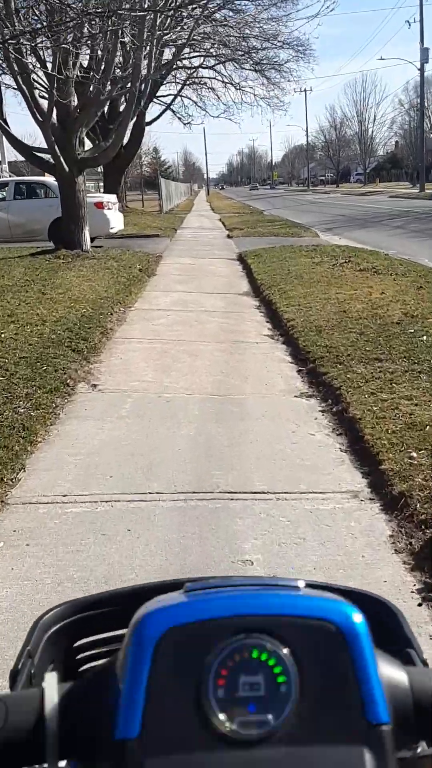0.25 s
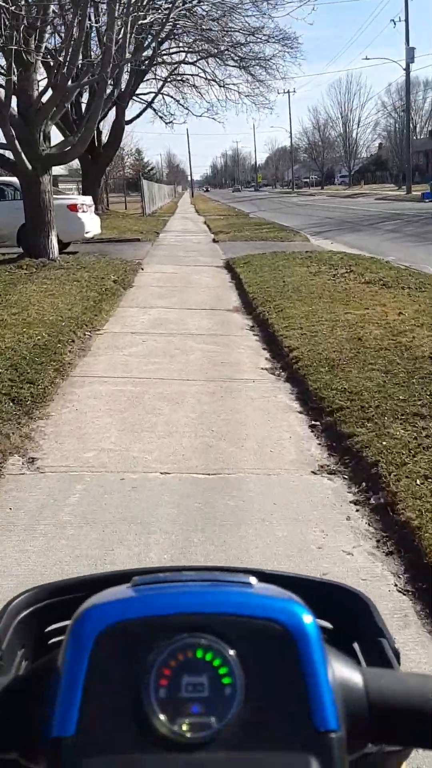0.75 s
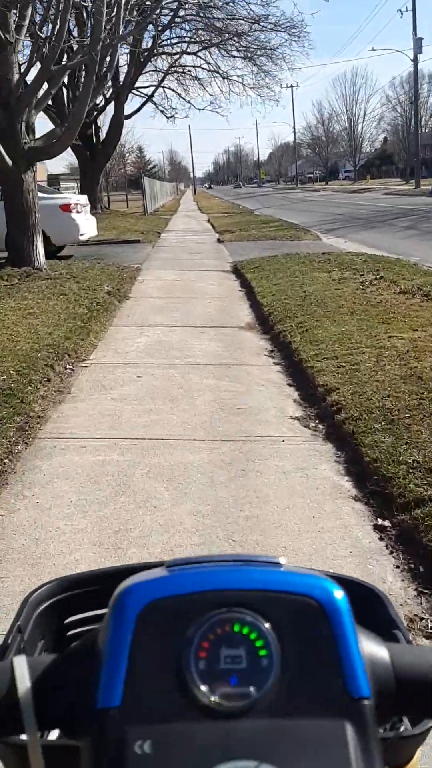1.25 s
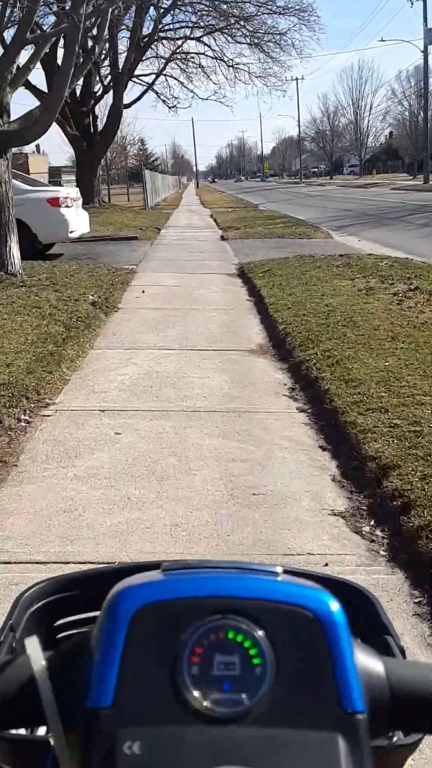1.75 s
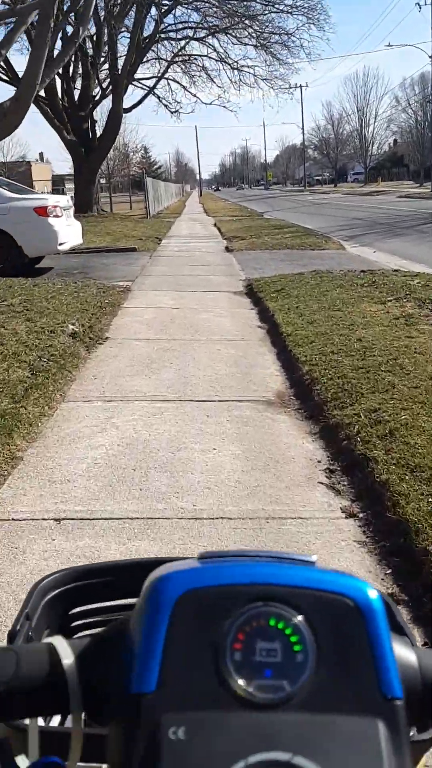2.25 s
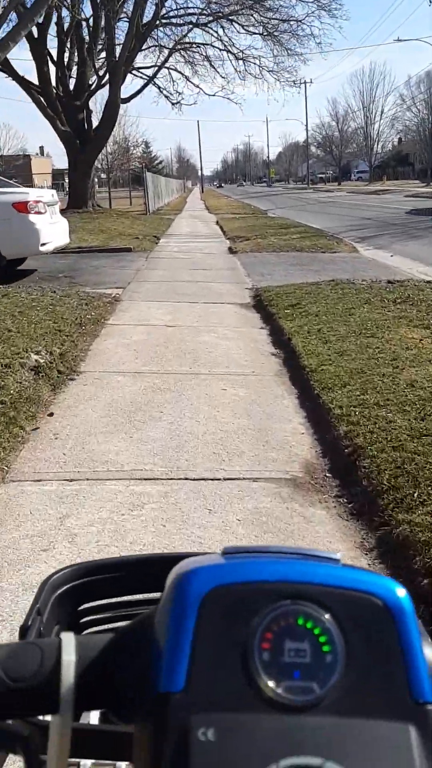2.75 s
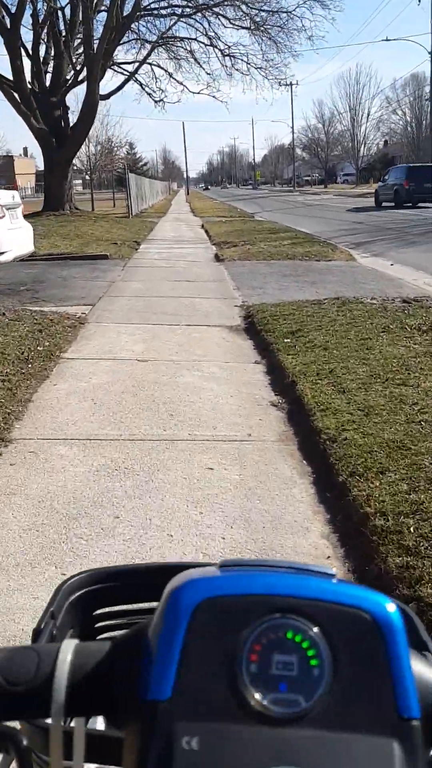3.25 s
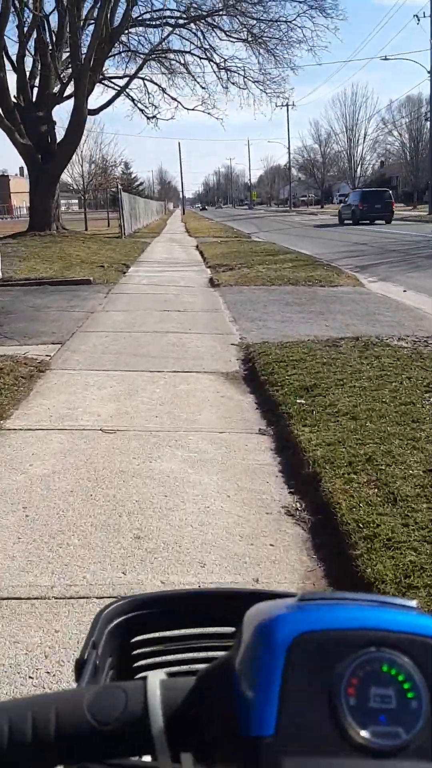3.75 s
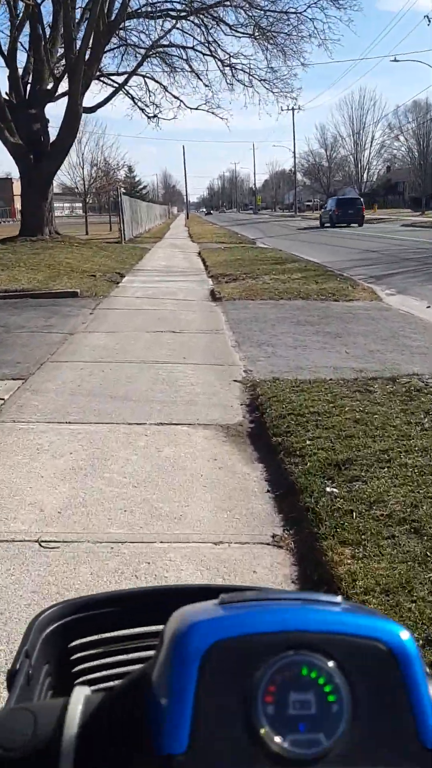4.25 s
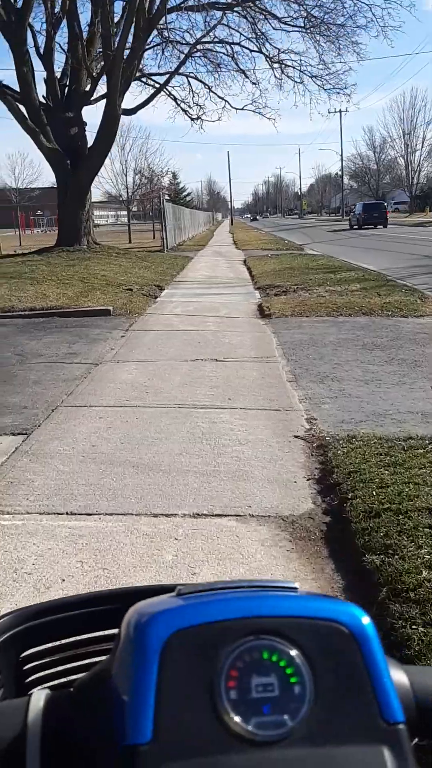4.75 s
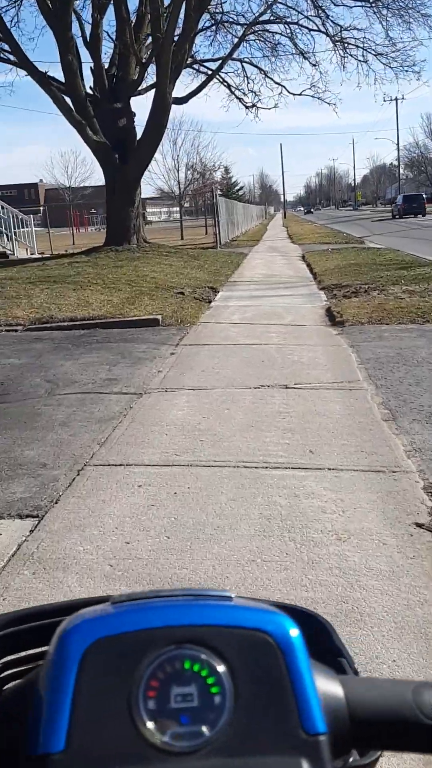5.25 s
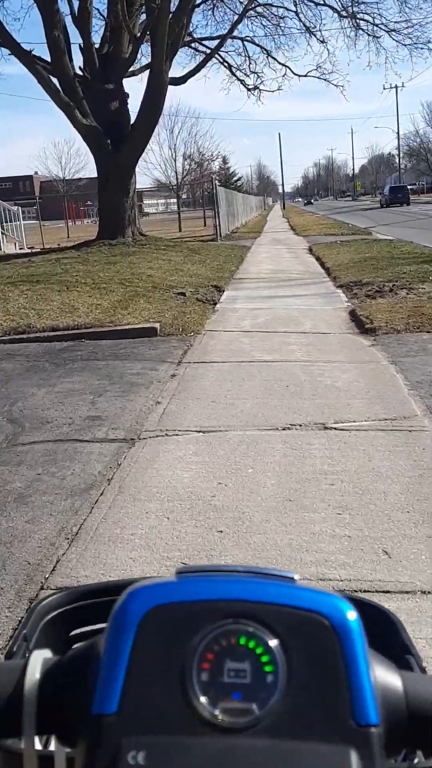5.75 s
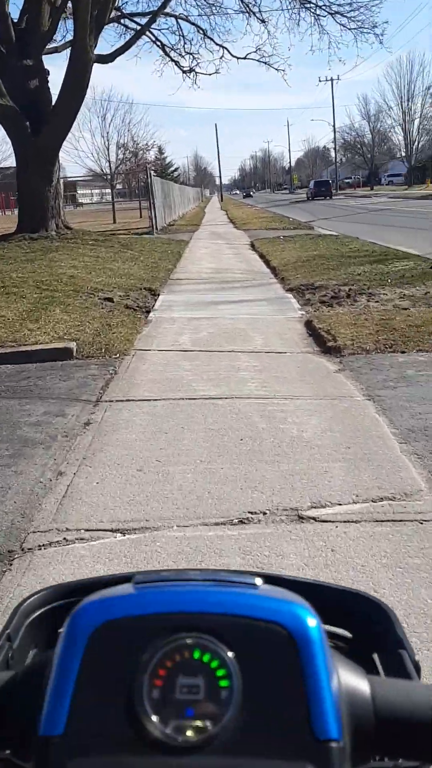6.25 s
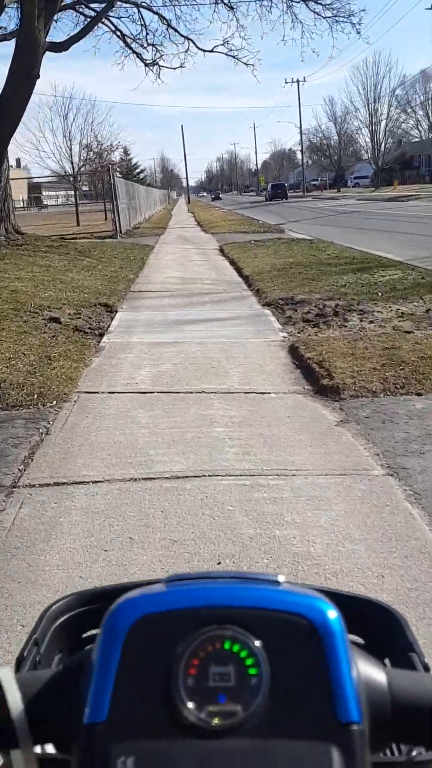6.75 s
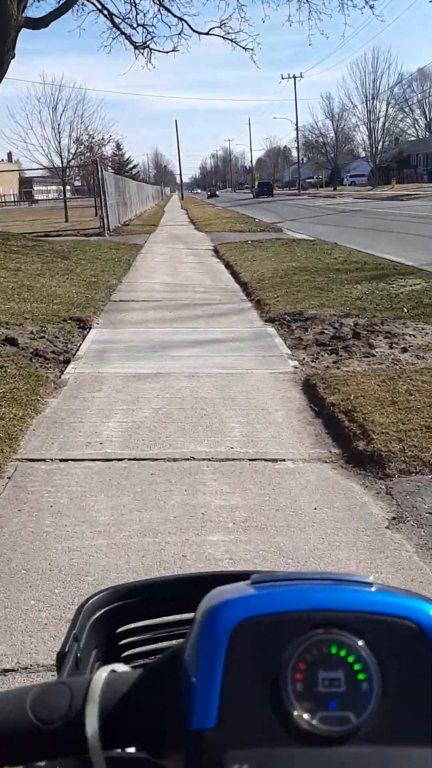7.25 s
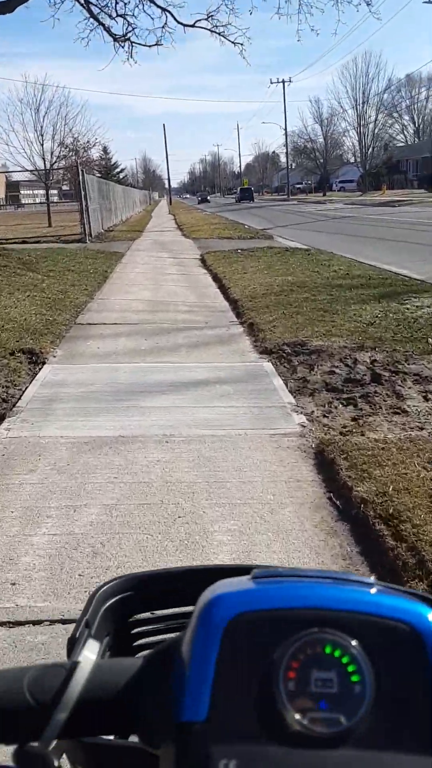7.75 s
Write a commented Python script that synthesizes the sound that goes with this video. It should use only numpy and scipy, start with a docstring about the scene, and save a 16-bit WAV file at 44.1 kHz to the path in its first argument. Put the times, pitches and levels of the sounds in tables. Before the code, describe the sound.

Outdoors beside a road, close stereo on a moving electric scooter. It starts with gritty rolling, whirr and airy traffic noise; at 0.2 s a hard joint gives a deep hollow double thump and a burst of crisp plastic clacks. Further jolts come near 0.9 and 1.2 s, then a very strong, rattling one at 1.55-1.9 s. From about 2 to 5 s the ride is calmer: traffic dips, small knocks and ticks come at 2.2, 2.9, 3.1, 3.7 and 4.2 s, with a sharper clack at 4.5 s. Barely audible thin high tones waver around 3.1-3.7 s, and low wind brushes near 3.9 s. Bumps grow again at 5.15 and 5.75 s, then heavy thumps and bright chatter crowd 6.1-6.6, 6.8-7.1 and 7.5-7.8 s. Traffic fades towards the end while rolling and whirr continue to 8 s.

```python
"""An electric scooter rolls along a concrete footpath: tyre blows and a lumpy drone ring its hollow body.
Slab joints shake the plastic basket and panels, whose resonances clack and chatter.
Motor and tyres whirr and road traffic hisses alongside, both as noise through fixed resonances.
Faint thin high tones waver slightly as sines, and a light wind brushes two microphone ports as low noise."""
import sys
import numpy as np
from scipy import signal
from scipy.fft import rfft, irfft
from scipy.io import wavfile
from scipy.ndimage import uniform_filter1d

SR = 44100
rng = np.random.default_rng(int(sys.argv[2]) if len(sys.argv) > 2 else 0)


def dump_mix(stems):
    """Bounce the given channels to the path in sys.argv[1] as a 16-bit WAV at rate SR."""
    frames = np.atleast_2d(stems).T  # one column per channel
    limited = np.clip(frames, -1, 1)  # hard clip at full scale
    pcm = np.round(limited * 32767).astype(np.int16)
    wavfile.write(sys.argv[1], SR, pcm)


N = 352800
OPPOSITE = np.array([[1], [-1]])  # signs at the left and right port


def undb(db):
    """Logarithmic level: decibels to amplitude gain."""
    return 10 ** (np.asarray(db) / 20)


def level(x, db=0):
    """Effective level: scales a signal to an rms in dB."""
    return x * undb(db) / np.sqrt(np.mean(x ** 2))


def unit(x):
    """Normalisation: scales a signal to peak 1."""
    return x / abs(x).max()


def band(x, hz, width_hz):
    """Simple resonance: a two-pole filter with gain 1 at its centre."""
    return signal.lfilter(*signal.iirpeak(hz, hz / width_hz, fs=SR), x)


def twice(x, hz, width_hz):
    """Cascaded resonance: two equal passes steepen the skirts."""
    return band(band(x, hz, width_hz), hz, width_hz)


def ring(x, modes):
    """Modal superposition: resonances add, each passed twice so the valleys stay dark."""
    # each pass is wider than the mode, because cascading narrows it
    return sum(undb(db) * twice(x, hz, 1.49 * width_hz) for hz, width_hz, db in modes)


def pair(size, alike):
    """Partial coherence: mid and side noise give two ports a correlation of alike."""
    mid, side = rng.standard_normal((2, size))
    return np.sqrt(1 + alike) * mid + np.sqrt(1 - alike) * side * OPPOSITE


def walk(rate):
    """Slow random modulation: levels held 1 / rate s and slewed twice, with a spread near 1."""
    hold = int(SR / rate)
    steps = np.repeat(rng.standard_normal(N // hold + 1), hold)
    slewed = uniform_filter1d(uniform_filter1d(steps, hold), hold)
    return 2.57 * slewed[:N]


def curves(table):
    """Linear interpolation: joins each column of a table by straight lines in time."""
    times_s, *columns = np.transpose(table)
    return [np.interp(np.arange(N) / SR, times_s, column) for column in columns]


def add(out, s, sound):
    """Linear superposition: mixes a sound in at time s."""
    at = int(s * SR)
    out[:, at:at + sound.shape[1]] += sound[:, :N - at]


def late_left(x, ms):
    """Interaural-style time difference: a phase turn delays the left port (negative: it leads)."""
    turn = np.exp(-2j * np.pi * np.arange(N // 2 + 1) * SR / N * ms / 1000)
    return np.array([irfft(rfft(x[0]) * turn, N), x[1]])


def hiss(modes, alike, flicker_db):
    """Filtered noise: each resonance flickers a little on its own."""
    return level(sum(undb(flicker_db * walk(12)) * ring(pair(N, alike), [mode]) for mode in modes))


def ticking(rate, spread_db, smear_s, alike):
    """Shot noise: random ticks, many small and a few bigger, smear into a noise over a steady floor."""
    size_db = spread_db * np.minimum(rng.exponential(size=N), 3.5)  # capped at 3.5 spreads
    ticks = (rng.random(N) < rate / SR) * undb(size_db)
    smeared = signal.lfilter([1], [1, -np.exp(-1 / (smear_s * SR))], ticks)
    return pair(N, alike) * (uniform_filter1d(smeared, size=70) + 0.45)


def wind(db):
    """Turbulence noise: low buffeting on the ports, nearly independent and weaker in the deep bass."""
    gusts = pair(N, 0.091) * undb(walk(25))
    # each mode: Hz, width Hz, relative dB
    return undb(db) * level(ring(gusts, [(139, 122, 5.0), (70, 86, -1.5), (35, 36, -7.0)]))


# Faint thin high tones.
# Each row: start in seconds, length in seconds, pitch in Hz, peak level in dB.
THIN_TONES = [(3.09, .15, 7300, -66), (3.2, .11, 4950, -62), (3.54, .17, 7250, -63)]


def thin_tones():
    """Frequency modulation: nearly steady tones waver slightly in pitch and have soft ends."""
    out, waver = np.zeros((2, N)), walk(30)
    for s, length_s, hz, db in THIN_TONES:
        size = int(length_s * SR)
        pitch_hz = hz * (1 + 0.0022 * waver[int(s * SR):][:size])
        tone = np.sin(2 * np.pi * np.cumsum(pitch_hz) / SR)
        add(out, s, undb(db) * signal.windows.tukey(size, .6) * tone * np.ones((2, 1)))
    return out


# Resonances that colour the roar of passing traffic.
# Each row: centre in Hz, width in Hz, relative gain in dB.
TRAFFIC_MODES = [(438, 325, 1), (703, 320, -2), (1060, 270, -5), (1580, 450, -12), (2080, 210, -14.5),
                 (4470, 480, -20.5)]


def road(db):
    """Broadband rolling noise: tyre roar of passing traffic."""
    return undb(db) * hiss(TRAFFIC_MODES, 0.9, 1.7)


# Housing resonances in which motor, gears and tread sing.
# Each row: centre in Hz, width in Hz, relative gain in dB.
WHIRR_MODES = [(868, 168, 8), (1420, 400, 3), (2053, 310, -1.5), (3360, 2200, -20.5), (4320, 770, -15),
               (7400, 420, -23), (11600, 3100, -27)]


def whirr(db):
    """Housing resonance: noise of motor, gears and tread, roughened by fast random level changes."""
    return undb(db + 1.23 * walk(70)) * hiss(WHIRR_MODES, 0.41, 0.53)


# A wheel crosses a joint or crack and the scooter shakes.
# Each row: start of the full shake in seconds, hold in ms, drone of the body in dB,
# chatter of loose parts in dB.
JOLTS = [(0.222, 81, -16.5, -32), (0.47, 20, -27, -45), (0.88, 11, -20.5, -37), (1.19, 40, -22.5, -31),
         (1.562, 80, -16.5, -31.5), (1.838, 6.4, -22.5, -39.5), (2.2, 28, -25.5, -44.5),
         (2.87, 15, -25.5, -39.5), (3.14, 8.2, -40, -50), (3.75, 18, -30, -43.5), (4.16, 47, -27, -46),
         (4.48, 16, -32, -40.5), (5.149, 18, -21, -36), (5.488, 28, -24.5, -44), (5.749, 10, -20, -34.5),
         (6.12, 62, -19, -34), (6.428, 71, -21, -36), (6.81, 77, -15.5, -29.5), (7.1, 45, -22.5, -41),
         (7.498, 110, -18, -34), (7.79, 26, -27.5, -38), (7.99, 10, -38, -41)]
RISE_DB_PER_S = 395  # build-up before a jolt


def shaking(grit_db, jolts_db, fall_db_per_s):
    """Energy summation: powers of the grit and of jolts that build, hold and settle exponentially."""
    t, power = np.arange(0, N, 64) / SR, 0
    for (s, hold_ms, *_), db in zip(JOLTS, jolts_db):
        rise_db = RISE_DB_PER_S * np.maximum(s - t, 0)
        fall_db = fall_db_per_s * np.maximum(t - s - hold_ms / 1000, 0)
        power = power + undb(db - rise_db - fall_db) ** 2
    return 10 * np.log10(undb(grit_db) ** 2 + np.interp(np.arange(N) / SR, t, power))


# Resonances of the plastic: two large low panels, three that crunch, then the bright edges.
# Each row: centre in Hz, width in Hz, relative gain in dB.
PANEL_MODES = [(863, 96, 6), (1365, 550, -1), (2176, 660, 18.5), (3044, 740, 14.5), (4220, 1610, 11.5),
               (6510, 600, 16.5), (8300, 1500, 2), (10300, 3100, 9.5), (13800, 3600, 7.5)]
LOW_PANELS, PANELS, EDGES = PANEL_MODES[:2], PANEL_MODES[2:5], PANEL_MODES[5:]


def chatter(db, bright_db):
    """Multiple random impacts: each panel has ticks of its own, the bright edges tick together."""
    crunch = sum(ring(ticking(130, 3.2, 0.0057, 0.54), [mode]) for mode in PANELS)
    edges = ring(ticking(90, 3.5, 0.003, 0.045), EDGES)
    thin_ring = ring(ticking(60, 2.3, .015, .1), [(15000, 350, 0)])  # narrow noise at 15 kHz
    thin_db = -14 + .72 * (db + bright_db + 50)  # relative to the edges: grows with strong shaking
    bright = level(edges) + undb(thin_db) * level(thin_ring)
    return undb(db) * (level(crunch) + undb(bright_db) * bright)


# Single clacks of the plastic.
# Each row: time in seconds, peak of the ringing panel in dB, its ring in Hz,
# bright crack relative to that peak in dB, time to fall 60 dB in ms.
PLASTIC_CLACKS = [(0.226, -22, 2620, 6.5, 23), (0.262, -19.5, 3760, -5, 50), (0.29, -22, 2110, 2, 42),
                  (0.318, -9, 1870, -3.5, 11), (0.346, -32, 2980, 9.5, 60), (0.368, -23, 2400, 1, 25),
                  (0.378, -20, 1910, 2, 26), (0.472, -24, 2490, -12, 32), (0.491, -25, 2800, -8, 35),
                  (0.854, -19, 2160, -7, 23), (0.908, -24, 2190, 1.5, 33), (1.051, -35, 2060, -2, 39),
                  (1.145, -25.5, 2000, -4, 72), (1.164, -20, 2800, 0, 45), (1.182, -8, 1960, -16, 28),
                  (1.208, -22, 2200, -11, 23), (1.232, -21.5, 5000, 4, 26), (1.279, -19.5, 2170, -7, 12),
                  (1.299, -46, 4680, 8, 27), (1.391, -46, 1830, 20, 37), (1.556, -23, 2660, -11, 42),
                  (1.569, -18.5, 3230, 2, 38), (1.585, -20.5, 2600, 2, 40), (1.615, -21, 3000, -12, 69),
                  (1.625, -19.5, 3060, 0, 80), (1.634, -14.5, 4430, -16, 32), (1.683, -9.5, 2030, -9.5, 13),
                  (1.71, -27.5, 2130, 4, 60), (1.743, -26.5, 1600, 7, 17), (1.786, -11.5, 2130, -8, 35),
                  (1.823, -16.5, 2110, -5, 21), (1.872, -33, 3190, 10, 31), (1.894, -17.5, 2050, -4, 19),
                  (1.938, -25.5, 2050, -2, 16), (2.198, -24, 4360, -3, 25), (2.212, -28, 2200, 5, 33),
                  (2.273, -33, 2230, 1, 40), (2.292, -33, 4520, 3.5, 39), (2.443, -28, 2170, -5, 44),
                  (2.829, -31.5, 2230, -8, 27), (2.871, -26, 1940, -15, 26), (2.902, -24.5, 2000, -13, 18),
                  (2.917, -31.5, 2810, 7, 32), (3.134, -21, 2050, -3.5, 62), (3.15, -25, 2490, -0.5, 41),
                  (3.339, -32, 2120, -4, 22), (3.408, -29.5, 2600, -6, 45), (3.481, -34, 2920, -17, 56),
                  (3.516, -33, 2430, -6, 39), (3.71, -32, 2130, -11, 31), (3.726, -27, 2870, -2.5, 90),
                  (3.755, -33, 2560, -9, 110), (4.098, -46, 1930, 13, 23), (4.189, -25, 2330, -18, 86),
                  (4.229, -25, 2940, -1.5, 14), (4.272, -27, 2140, -3, 15), (4.282, -25, 2160, 0, 12),
                  (4.353, -48.5, 1600, 17.5, 31), (4.393, -35, 2540, -18, 27), (4.468, -28.5, 2700, 0, 32),
                  (4.482, -17.5, 2450, -1.5, 30), (4.495, -22.5, 2420, -20, 20), (4.539, -30, 2050, -7, 33),
                  (4.554, -29.5, 2100, 0.5, 20), (4.565, -32, 2140, -19, 36), (4.595, -34, 2420, -21, 38),
                  (4.622, -29.5, 2900, -11, 76), (4.902, -25, 2240, -3, 19), (5.082, -28, 2370, -7, 48),
                  (5.145, -17, 4420, -5, 35), (5.166, -21, 2730, 7, 32), (5.181, -26, 2220, -20, 88),
                  (5.202, -23.5, 2120, -7, 27), (5.213, -28, 4460, -1, 43), (5.243, -25, 2100, -26, 24),
                  (5.492, -29, 2180, -13, 32), (5.614, -27, 2210, -13, 34), (5.755, -27.5, 4330, -2, 39),
                  (5.771, -23.5, 2190, 0.5, 20), (5.781, -27, 2620, -7, 23), (5.834, -27, 2230, -3, 30),
                  (5.884, -39.5, 4600, 5, 38), (6.123, -25, 4500, 3, 24), (6.174, -19.5, 2950, -1, 64),
                  (6.193, -20, 2140, -4, 32), (6.226, -11.5, 2000, -18, 23), (6.254, -31, 3080, 3, 40),
                  (6.273, -17, 1860, -2, 17), (6.326, -39, 1920, 12, 20), (6.378, -36, 1670, 9.5, 19),
                  (6.435, -16, 2110, -8, 30), (6.481, -15.5, 2110, -3, 53), (6.5, -29, 1930, 3, 26),
                  (6.53, -15.5, 1960, 1, 19), (6.551, -24, 4700, -7, 25), (6.578, -21, 2400, -5, 38),
                  (6.59, -24, 2170, 1, 44), (6.779, -26.5, 2920, 5, 35), (6.801, -32, 3110, -23, 52),
                  (6.817, -22, 2180, 6, 33), (6.84, -24, 2740, 11, 39), (6.885, -17.5, 4480, 1, 45),
                  (6.905, -21.5, 2190, 4.5, 36), (6.936, -8.5, 2010, -5, 23), (6.959, -27.5, 2400, 6, 27),
                  (7.013, -40, 1680, 6.5, 48), (7.041, -21.5, 1860, 0, 22), (7.107, -21.5, 2140, -12, 21),
                  (7.113, -24, 2100, -1, 80), (7.186, -27, 2800, -3, 26), (7.31, -27, 2360, -27, 14),
                  (7.506, -26, 2220, -2, 30), (7.521, -18, 2030, -16, 35), (7.543, -19.5, 3030, -12, 41),
                  (7.561, -19, 2000, 0, 60), (7.613, -14, 1960, -0.5, 21), (7.64, -27, 2160, 6.5, 23),
                  (7.712, -22, 2090, -6, 14), (7.751, -29.5, 2100, 8, 26), (7.77, -21, 2130, -19, 24),
                  (7.781, -32, 5160, 8, 27), (7.825, -22, 2270, -3, 52), (7.856, -33, 4670, -7, 25),
                  (7.988, -33, 2170, 5, 20)]
PASS_WIDTH_HZ = 600  # of each of the two passes through the ringing panel


def clacks():
    """Impact excitation: a noise burst rings one panel, the others join in, the edge cracks brightly."""
    out, ms = np.zeros((2, N)), np.arange(2000) * 1000 / SR
    for s, db, hz, crack_db, t60_ms in PLASTIC_CLACKS:
        # short bursts also start sharply
        burst = (1 - np.exp(-ms / (0.039 * t60_ms))) * undb(-60 * ms / t60_ms)
        panel, others, crack = [pair(len(ms), alike) * burst for alike in (0.8, 0.15, 0.026)]
        join_db = -0.25 * (db + 17.0)  # a hard blow rings its own panel more purely
        knock_db = -2.5 + 0.081 * (db + 6.5)  # hard blows reach the large, low panels a little more
        sound = unit(twice(panel, hz, PASS_WIDTH_HZ))
        sound = sound + undb(join_db) * unit(ring(others, PANELS))
        sound = sound + undb(knock_db) * unit(ring(others, LOW_PANELS))
        sound = sound + undb(crack_db) * unit(ring(crack, EDGES))
        lean_db = 0.77 * rng.standard_normal() * OPPOSITE  # towards one port or the other
        add(out, s - .0008, sound * undb(db + lean_db))
    return out


# Resonances of the hollow body.
# Each row: centre in Hz, width in Hz, relative gain in dB.
BODY_MODES = [(241, 76, -6.5), (292, 77.3, 3.5), (390.3, 19, 4), (647, 106, -9.5), (920, 77, -11),
              (1420, 210, -20)]


def drone(db):
    """Forced vibration: gritty concrete rings the body in lumps; a deep shudder comes through the hand."""
    body = level(ring(pair(N, 0.92) * undb(1.23 * walk(45)), BODY_MODES))
    shudder = level(ring(pair(N, 0.22), [(118, 137, 0.0), (50.3, 97, 3.0)]), -23.5)
    return undb(db) * (body + shudder)


# Soft tyre blows that swell in the body.
# Each row: start in seconds, peak of the swell in dB, ring in Hz.
TYRE_BLOWS = [(0.199, -26, 310), (0.227, -8, 353), (0.278, -5.5, 290), (0.379, -27, 356),
              (0.835, -16.5, 389), (0.888, -8, 342), (1.021, -18.5, 410), (1.175, -18.5, 417),
              (1.231, -9.5, 308), (1.534, -18, 358), (1.557, -0.5, 321), (1.58, -4.5, 306),
              (1.632, -6.5, 360), (1.665, -10.5, 357), (1.842, -32, 288), (2.186, -20, 334),
              (2.532, -27, 302), (2.857, -19, 285), (3.133, -20.5, 305), (3.326, -27, 285),
              (3.562, -16.5, 218), (3.603, -20.5, 340), (3.757, -14.5, 269), (3.897, -19, 257),
              (4.18, -18, 276), (4.464, -18.5, 294), (4.496, -20, 310), (4.614, -25, 288),
              (4.826, -22, 287), (5.148, -14, 263), (5.25, -22, 320), (5.356, -23.5, 302),
              (5.746, -12.5, 367), (6.093, -15.5, 196), (6.167, -8, 353), (6.336, -21.5, 297),
              (6.423, -14.5, 298), (6.478, -8.5, 306), (6.547, -27, 316), (6.587, -17, 268),
              (6.798, -8, 295), (6.811, -3, 310), (6.874, -9, 378), (6.935, -27, 283), (7.082, -25, 304),
              (7.13, -11.5, 285), (7.491, -9.5, 356), (7.518, -4.5, 280), (7.561, -3, 320),
              (7.771, -18, 304), (7.83, -18, 285)]
SWELL_MS = 4.9  # rise of a blow to its peak


def thumps():
    """Compliant impact: a soft tyre pushes slowly, so a tone swells and dies while the frame knocks along."""
    out, ms = np.zeros((2, N)), np.arange(3000) * 1000 / SR
    for (s, db, hz), start_turns in zip(TYRE_BLOWS, rng.random(len(TYRE_BLOWS))):
        x = ms / SWELL_MS
        push = (x * np.exp(1 - x)) ** 3.15  # peak 1
        swell = push * np.sin(2 * np.pi * (hz * ms / 1000 + start_turns))
        knock = unit(ring(pair(len(ms), 0.8) * push, BODY_MODES[3:]))  # upper modes only
        add(out, s, undb(db) * (swell + undb(-9.0) * knock))
    return out


# Grit of the slabs between the joints.
# Each row: time in seconds, drone of the body in dB, chatter of loose parts in dB.
SLAB_GRIT = [(0.0, -33.5, -49), (0.18, -41, -60), (0.5, -31, -48.5), (1.1, -31.5, -48.5), (1.5, -32.5, -57),
             (2.1, -35.5, -53.5), (2.8, -37, -58.5), (3.1, -31.5, -51), (4.1, -31, -50.5),
             (4.4, -32, -51.5), (4.9, -31.5, -53), (5.3, -34, -53.5), (6.0, -32, -49), (6.7, -32, -48.5),
             (7.0, -35.5, -45), (7.4, -36.5, -56), (8.0, -37, -47.5)]
# Levels of the continuous sounds.
# Each row: time in seconds, traffic in dB, whirr of motor and tyres in dB, wind in dB.
SURROUNDINGS = [(0.0, -32, -38, -73), (0.4, -30, -36.5, -41), (0.8, -31, -37.5, -52),
                (1.51, -38.5, -34, -35), (2.16, -68, -41.5, -46), (3.4, -41.5, -44, -38.5),
                (3.88, -44.5, -43.5, -32), (4.5, -40.5, -43, -43.5), (5.3, -40.5, -40.5, -43),
                (5.72, -33, -46.5, -39), (6.3, -38, -37.5, -37.5), (6.66, -37.5, -38.5, -44),
                (7.1, -44, -40.5, -50), (7.7, -62, -40.5, -33.5), (8.0, -60, -44.5, -46.5)]
DRONE_FALL, CHATTER_FALL, EDGE_FALL = 219, 158, 76  # settling after a jolt, dB per s; edges last longest
EDGE_DB = -9.5  # bright edges relative to the chatter at full shake
SCOOTER_LAG_MS, BASKET_LAG_MS, ROAD_LAG_MS = .35, .02, -.11  # lag of the left port


def scene():
    """Time-difference stereo: body, basket and road reach the two ports from different sides."""
    grit_drone_db, grit_chatter_db = curves(SLAB_GRIT)
    jolt_drone_db, jolt_chatter_db = np.transpose(JOLTS)[2:]
    drone_db = shaking(grit_drone_db, jolt_drone_db, DRONE_FALL)
    chatter_db = shaking(grit_chatter_db, jolt_chatter_db, CHATTER_FALL)
    bright_db = EDGE_DB + shaking(grit_chatter_db, jolt_chatter_db, EDGE_FALL) - chatter_db
    road_db, whirr_db, wind_db = curves(SURROUNDINGS)
    beside = late_left(road(road_db) + whirr(whirr_db), ROAD_LAG_MS)
    basket = late_left(clacks() + chatter(chatter_db, bright_db), BASKET_LAG_MS)
    body = late_left(thumps() + drone(drone_db), SCOOTER_LAG_MS)
    return wind(wind_db) + thin_tones() + beside + basket + body


def record(dry):
    """Transducer response: bass loss, a treble tilt to the right, faint hiss, rounded peaks, a cut top."""
    dry = signal.sosfilt(signal.butter(1, 60, "high", fs=SR, output="sos"), dry)
    treble = signal.sosfilt(signal.butter(2, 350, "high", fs=SR, output="sos"), dry)
    wet = dry * undb(-.25 * OPPOSITE) - .11 * treble * OPPOSITE  # the right port is louder
    wet = wet + level(rng.standard_normal((2, N)), -71)  # self-noise
    wet = wet / (1 + abs(wet) ** 6) ** (1 / 6)  # soft limit at 1
    return signal.sosfilt(signal.ellip(10, .2, 70, 15800, fs=SR, output="sos"), wet)


dry = scene()
out = record(dry)
dump_mix(out)
```